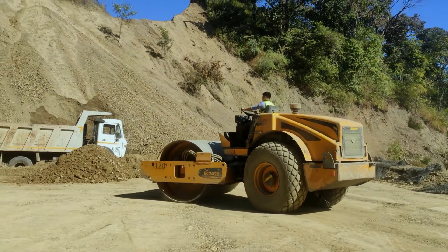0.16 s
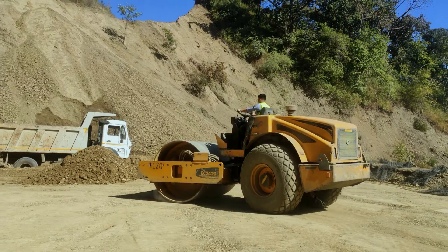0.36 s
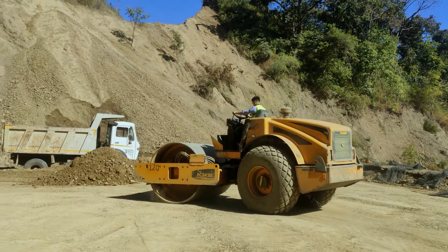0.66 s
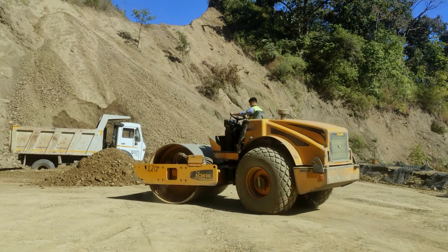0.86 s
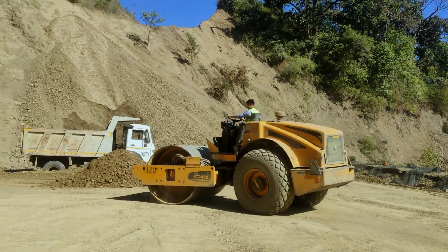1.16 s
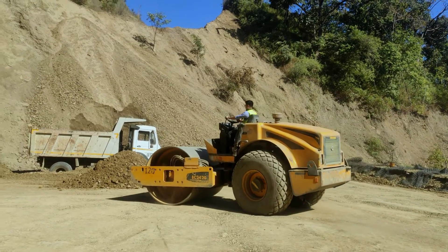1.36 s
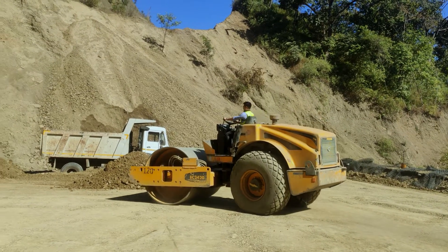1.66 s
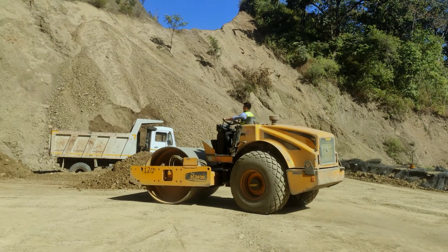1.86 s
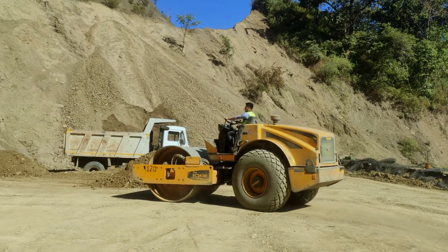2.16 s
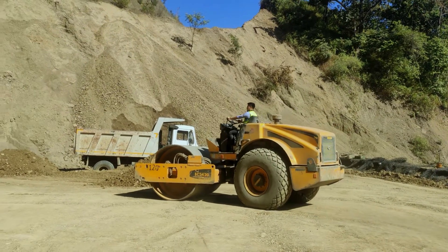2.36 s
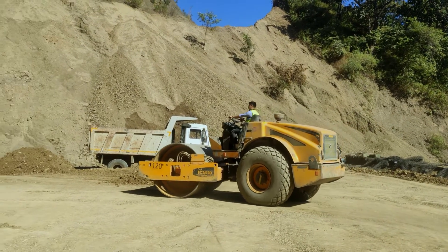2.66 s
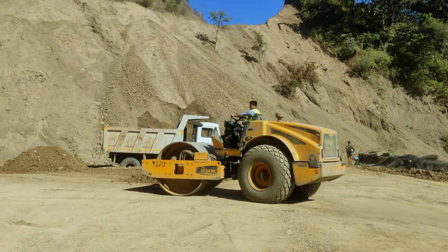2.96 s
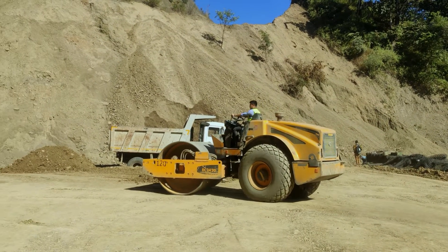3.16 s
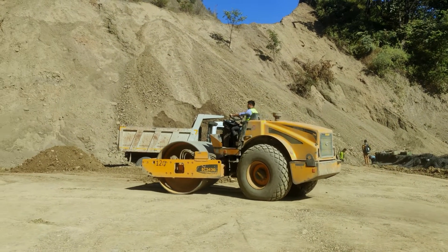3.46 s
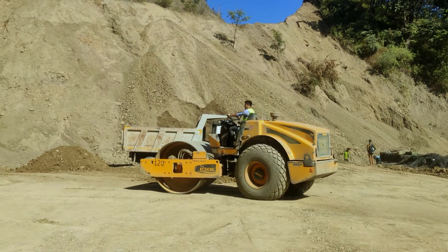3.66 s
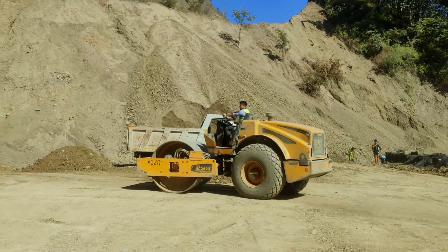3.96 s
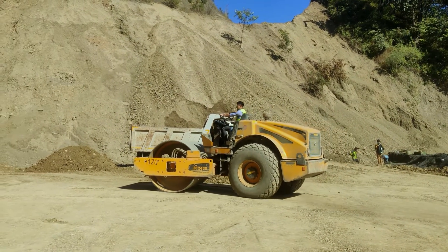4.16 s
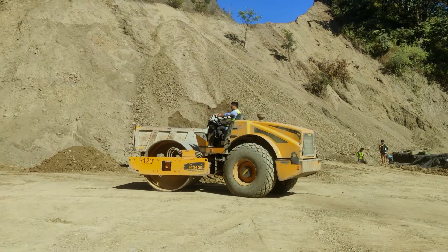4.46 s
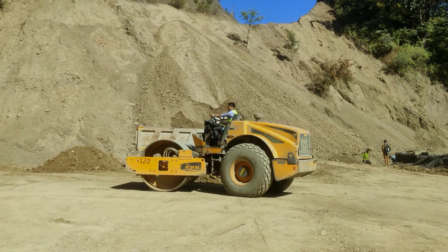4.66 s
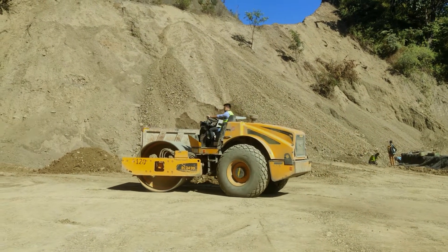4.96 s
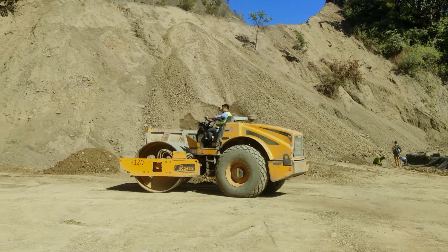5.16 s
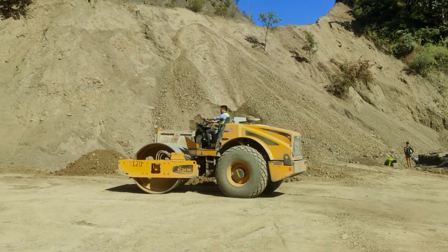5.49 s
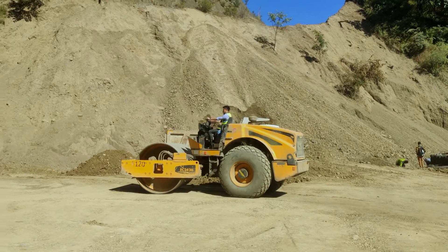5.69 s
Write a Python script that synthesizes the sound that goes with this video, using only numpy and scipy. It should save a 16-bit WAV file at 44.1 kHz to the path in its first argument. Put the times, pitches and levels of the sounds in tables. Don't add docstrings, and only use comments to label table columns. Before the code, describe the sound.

A heavy diesel roller works on open dirt some metres from a small microphone. Its deep hum near 100 Hz stays almost perfectly steady, joined by a hydraulic drone near 290 Hz that swells and dips. Dull fan and engine roar fills the background. Tiny high scraper squeaks dot the first two and a half seconds, and a faint motor whine enters around three seconds.

```python
import sys
import numpy as np
from scipy import signal
from scipy.fft import rfft, irfft, next_fast_len
from scipy.io import wavfile

SR = 44100
rng = np.random.default_rng(int(sys.argv[2]) if len(sys.argv) > 2 else 0)


def pcm_store(signal):
    levels = np.round(np.clip(np.atleast_2d(signal), -1, 1) * 32767)
    wavfile.write(sys.argv[1], SR, levels.astype(np.int16).T)


def boost(x):
    u = np.asarray(x, float) / 20
    return 10 ** u


N = 257103
TIME = np.arange(N) / SR
STEP = 8

# frequency in Hz, level in dB per Hz.
RUMBLE = [(8, -67), (29, -69), (40, -58.5), (62, -62), (100, -55), (210, -59), (255, -55), (290, -47),
          (340, -61), (380, -57), (480, -62.5), (690, -61), (850, -65), (1200, -69.5)]
# frequency in Hz, level in dB per Hz.
ROAR = [(1200, -71), (1600, -74.5), (2150, -84), (2800, -81), (3500, -90.5), (4500, -91), (5300, -101),
        (6150, -108), (7000, -102), (8500, -108), (9800, -113), (10600, -112), (12000, -118), (16000, -126)]
# time in seconds, share from 0 to 1.
FACING = [(0, 0.6), (.8, 0.28), (2.2, 0.1), (3.5, 0.98), (4.7, 0.9), (5.83, .4)]
# start in seconds, length in seconds, pitch in Hz, peak in dB,
# octave level in dB relative to the fundamental.
SQUEAKS = [(.018, .028, 5550, -61, -11), (.196, .032, 5550, -61, -26), (.405, .035, 5550, -65, -10),
           (.703, .022, 5560, -53.5, -22), (1.102, .024, 5450, -60, -28), (1.172, .026, 4050, -44, -17),
           (1.174, .024, 3800, -48, -18), (1.180, .020, 3450, -47.5, -25), (1.238, .028, 5750, -55, -19),
           (1.250, .010, 5400, -61, -16), (1.426, .017, 5750, -58, -17), (2.140, .022, 6600, -55, -26),
           (2.142, .018, 5780, -65, -30), (2.337, .028, 6660, -51, -23), (5.125, .025, 6700, -64, -25)]
# start in seconds, length in seconds, first pitch in Hz,
# settled pitch in Hz, rms level in dB.
DRIVE_SURGES = [
    (2.98, 1.7, 440, 389, -41.5),
    (4.82, .6, 427, 414, -44.5),
]
# frequency in Hz, rms level in dB.
BELT_SHAFTS = [
    (52.1, -48.5),
    (62.1, -51.5),
]
# time in seconds, rms level in dB.
PRESSURE = [(0, -30.5), (.52, -32), (.6, -18.5), (.75, -30.5), (.95, -21), (1.15, -28), (1.8, -26.5),
            (2.75, -27.5), (4.15, -26.5), (4.75, -27.5), (5.15, -21.5), (5.5, -22), (5.83, -19.5)]
# time in seconds, rate in engine cycles per second.
SPEED = [(0, 16.945), (.4, 16.957), (.65, 16.848), (1.3, 16.855), (1.95, 16.96), (2.2, 16.87),
         (3.05, 16.865), (3.22, 16.79), (4.3, 16.82), (4.47, 16.853), (5.08, 16.762), (5.58, 16.856),
         (5.83, 16.856)]
# multiple of cycle rate, rms level in dB.
GEARS = [(51, -52), (54, -56.5), (55, -56.5), (56, -54), (62, -55.5), (72, -62.5), (78, -61)]
# multiple of cycle rate, rms level in dB.
UNEVEN = [(1, -57.5), (2, -46), (14, -48), (20, -53), (26, -56), (33, -48), (38, -53.5), (45, -49)]
# multiple of cycle rate, rms level in dB.
LIFTED = [(3, -46), (7, -40), (10, -38), (13, -38.5), (15, -37.5), (16, -38.5), (18, -33.5), (22, -46),
          (28, -47), (34, -45), (36, -45.5), (40, -44.5), (41, -46)]
# multiple of cycle rate, middle in seconds,
# half-width in seconds, gain in dB.
PANELS = [
    (10, 2.4, .4, 6),
    (31, 4.05, .17, 14),
    (36, 4.5, .7, 13.5),
    (18, 5.55, .4, -5),
]


def in_time(rows):
    s, *columns = np.transpose(rows)
    return [np.interp(TIME, s, c) for c in columns]


def drift(rate, step=1):
    pole = np.exp(-80 * np.pi * rate / SR)
    noise = rng.standard_normal(N // 40 + 4002)
    slow = signal.lfilter([1], [1, -2 * pole, pole * pole], noise)[4000:]
    return np.interp(np.arange(0, N, step) / 40, np.arange(len(slow)), slow / slow.std())


def tone(turns, db):
    return np.sqrt(2) * boost(db) * np.sin(2 * np.pi * (turns + rng.random()))


def locked(crank, orders, sway_db, sway_rate):
    out = 0
    middle_s, half_width_s, gain_db = 5.25, .5, 3.5
    meshes = [(k, middle_s, half_width_s, gain_db) for k, _ in GEARS if k % 2 == 0]
    for order, db in orders:
        glint = sum(gain * np.exp(-((TIME[::STEP] - s) / width) ** 2)
                    for k, s, width, gain in PANELS + meshes if k == order)
        level = db + glint + sway_db * drift(sway_rate, step=STEP)
        out = out + tone(order * crank[::STEP], level)
    return signal.resample_poly(out, STEP, 1, padtype="line")[:N]


def roar(crank, gust_db, patchy_db):
    size = next_fast_len(N)
    octave = np.log2(np.maximum(np.arange(size // 2 + 1) * SR / size, 1))
    hz, db = np.transpose(RUMBLE + ROAR[1:])
    density = boost(np.interp(octave, np.log2(hz), db)) * np.sqrt(SR / 2)
    colour = rfft(rng.standard_normal(size)) * density

    facing, = in_time(FACING)
    boom_db = 1.5 - 0.37 * TIME
    low_db = -2.25 - 2.5 * facing
    mid_db = 0.58 + 2 * facing
    high_db = -2.5 + 2.5 * facing

    gust = gust_db * drift(21.0)
    throb = .7 * np.cos(2 * np.pi * crank) + .3 * np.cos(12 * np.pi * crank)
    out = np.zeros(N)
    for centre in np.arange(3, 14.5, .5):
        band = irfft(colour * np.clip(1 - 2 * abs(octave - centre), 0, 1), size)[:N]
        if centre < 6.8:
            turn_db = 0
        elif centre < 9.3:
            turn_db = boom_db
        elif centre < 10.6:
            turn_db = low_db
        elif centre < 12.4:
            turn_db = mid_db
        else:
            turn_db = high_db
        gust_share = np.clip((centre - 9) / 3, 0, 1)
        flicker = patchy_db * (drift(1.1) + drift(39.0))
        out += band * boost(turn_db + gust_share * gust + (9 < centre < 11.6) * throb + flicker)
    return out


def squeaks(slope_echo_s, echo_db):
    out, slips, shake = np.zeros(N), drift(130), drift(350)
    wander_hz = 85
    for s, length, hz, db, octave_db in SQUEAKS:
        span = slice(round(s * SR), round((s + length) * SR))
        progress = np.linspace(0, 1, len(TIME[span]))
        shape = np.sqrt(np.sin(np.pi * progress ** .7).clip(0))
        grip = boost(np.minimum(4.5 * (slips[span] - slips[span].mean()), 3) - 3)
        turns = np.cumsum(hz + wander_hz * shake[span]) / SR
        partials = np.sin(2 * np.pi * turns) + boost(octave_db) * np.sin(4 * np.pi * turns)
        out[span] += boost(db) * shape * grip * partials
    return out + boost(echo_db) * np.roll(out, round(slope_echo_s * SR))


def drive_motor():
    sag_s, engage_s = .5, .12
    whine = 0
    for s, length, first_hz, settled_hz, db in DRIVE_SURGES:
        hz = settled_hz + (first_hz - settled_hz) * np.exp(-((TIME - s) / sag_s) ** 2)
        engaged = np.clip(np.minimum(TIME - s, s + length - TIME) / engage_s, 0, 1)
        turns = np.cumsum(hz + 1.5 * drift(5)) / SR
        whine = whine + engaged * tone(turns, db + 1.5 * drift(4))
    return whine


def belt_shafts():
    return sum(tone(hz * TIME + 0.017 * drift(1.0), db + 3.9 * drift(0.78)) for hz, db in BELT_SHAFTS)


def pump(crank):
    pulses_per_cycle = 17.24
    steady_db, waver_per_db = -23, 0.3361
    first_db, = in_time(PRESSURE)
    waver_db = waver_per_db * np.maximum(steady_db - first_db, 0)
    turns = pulses_per_cycle * crank + .012 * waver_db * drift(9)

    second_db = -37 - .062 * TIME ** 3 - .2 * (first_db - np.median(first_db))
    upper = tone(2 * turns + .06 * drift(7), second_db + 1.5 * drift(7))
    return tone(turns, first_db + waver_db * drift(24.0)) + upper


def knocks(crank, start_db, tilt_db, scatter_db):
    orders = np.setdiff1d(np.arange(46, 96), np.array(GEARS)[:, 0])
    scatter = scatter_db * rng.standard_normal(len(orders))
    levels = start_db - tilt_db * (orders - orders[0]) + scatter
    return locked(crank, zip(orders, levels), sway_db=5.5, sway_rate=2.4)


def exhaust(crank):
    order, db = np.transpose(UNEVEN)
    weak = np.setdiff1d(np.arange(1, 46), [6] + [k for k, _ in LIFTED])
    levels = np.interp(weak, order, db) + 1 * rng.standard_normal(len(weak))
    others = list(zip(weak, levels)) + LIFTED + GEARS
    firing = tone(6 * crank, -17.1 + 0.15 * drift(2.5))
    return firing + locked(crank, others, sway_db=1.47, sway_rate=2.2)


def scene():
    crank = np.cumsum(in_time(SPEED)[0] * (1 + .0004 * drift(8))) / SR
    background = roar(crank, gust_db=0.5, patchy_db=0.28)
    scrapers = squeaks(slope_echo_s=.017, echo_db=-11)
    driven = drive_motor() + belt_shafts() + pump(crank)
    engine = knocks(crank, start_db=-56.0, tilt_db=0.46, scatter_db=3.0) + exhaust(crank)
    return (background + scrapers + driven + engine)[None]


def band_limit(x):
    return signal.sosfilt(signal.butter(12, 15720, fs=SR, output="sos"), x)


def record(dry):
    gate = np.clip(np.minimum(TIME + .0005, TIME[::-1]) / .0015, 0, 1)
    faded = dry * np.sin(gate * np.pi / 2) ** 2
    return band_limit(faded)


dry = scene()
out = record(dry)
pcm_store(out)
```